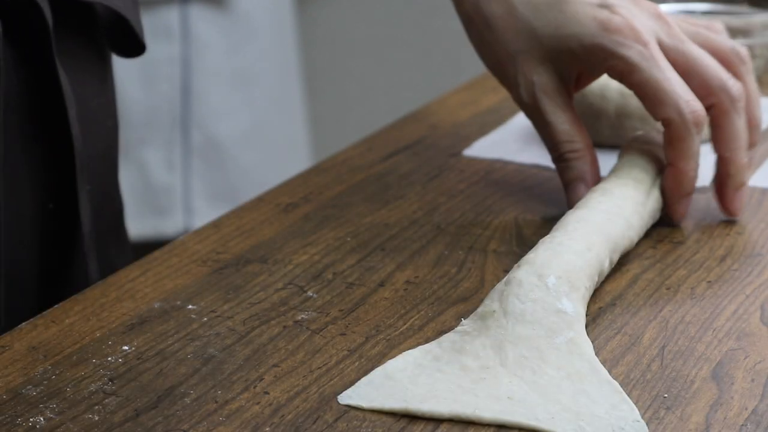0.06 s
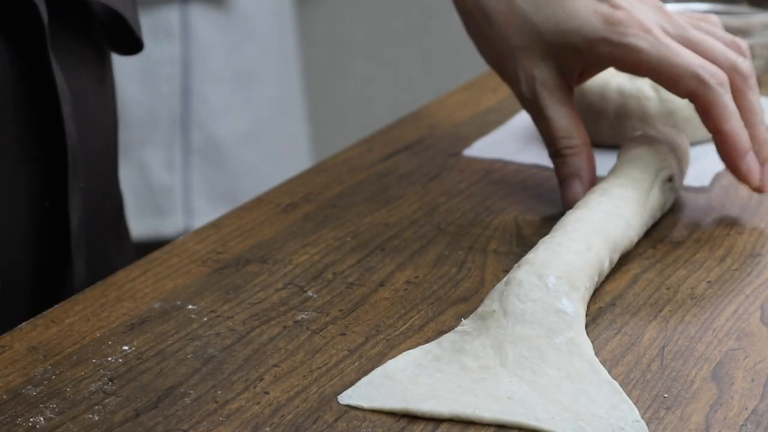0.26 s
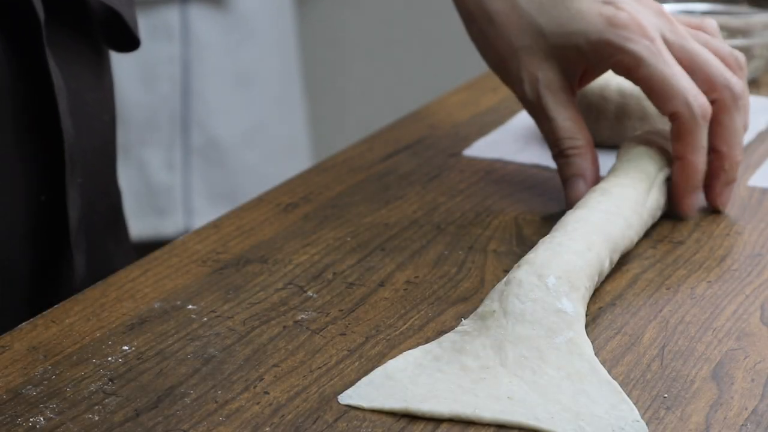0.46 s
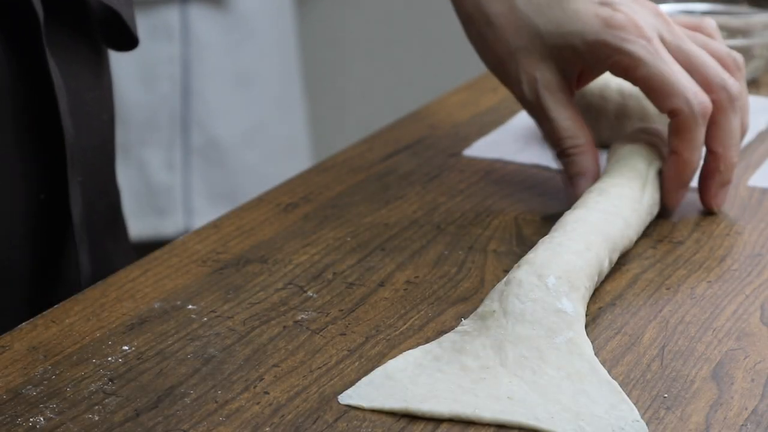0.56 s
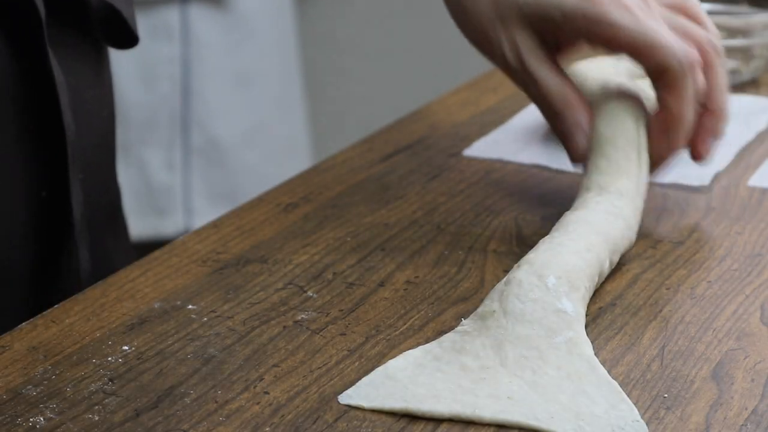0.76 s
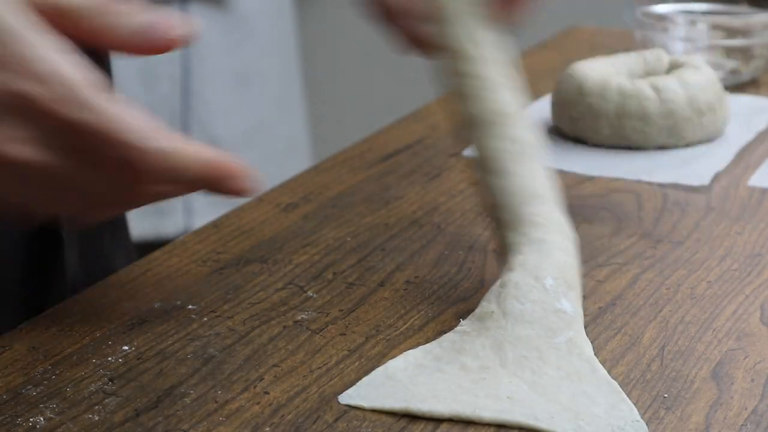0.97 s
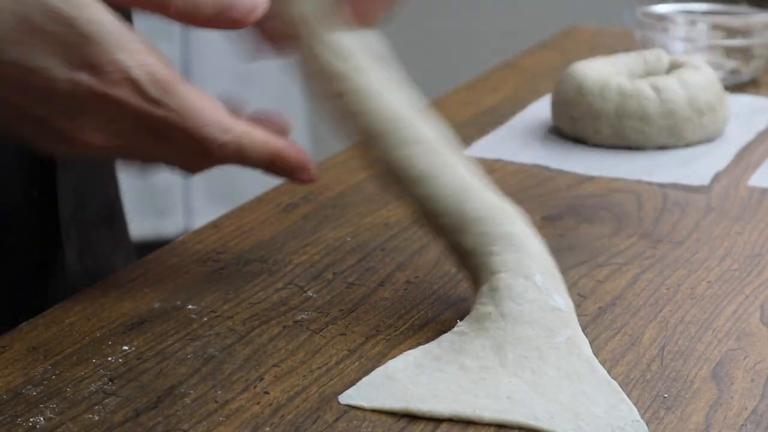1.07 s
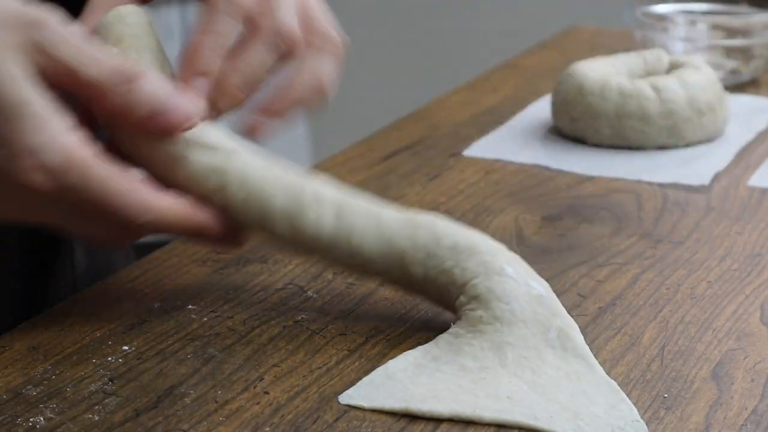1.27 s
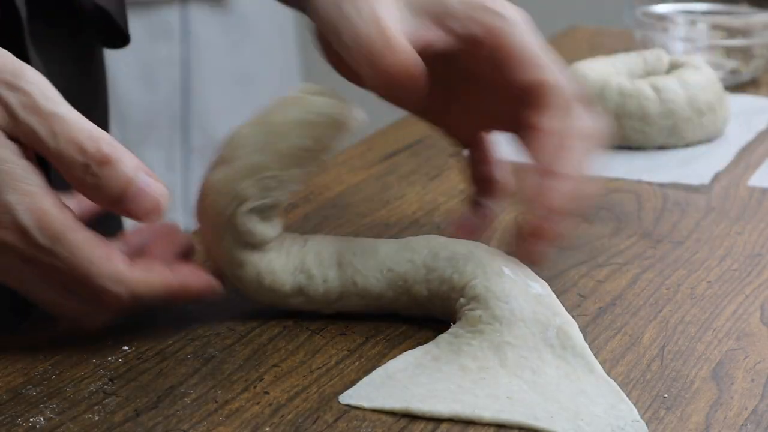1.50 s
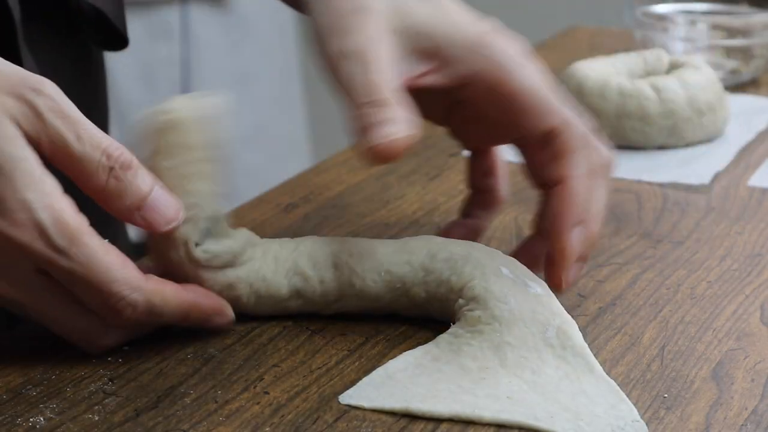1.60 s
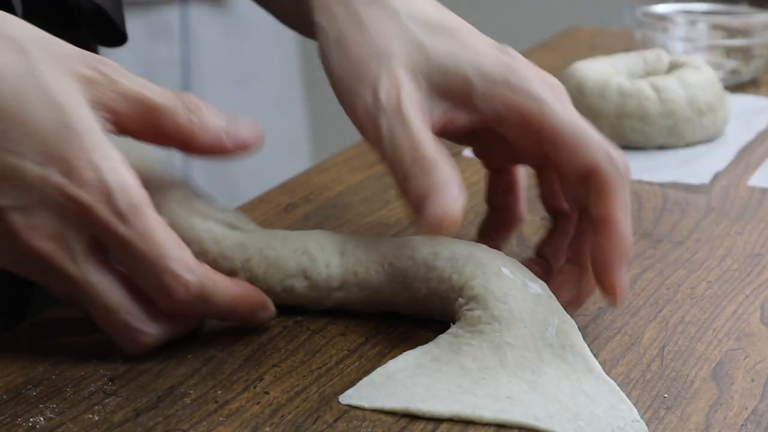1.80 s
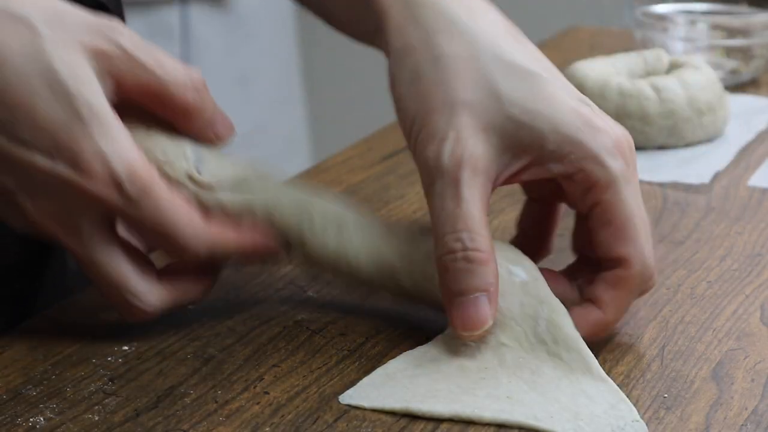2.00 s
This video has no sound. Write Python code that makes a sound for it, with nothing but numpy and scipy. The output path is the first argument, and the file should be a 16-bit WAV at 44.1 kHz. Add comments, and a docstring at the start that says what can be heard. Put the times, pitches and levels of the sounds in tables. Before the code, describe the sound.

A wooden rolling pin knocks sharply on a wooden table, echoing over faint kitchen hum.

```python
"""Room noise and the hum of a refrigerator motor, made of noise and sine waves, run all through two seconds.
From the first tenth of a second a wooden rolling pin knocks on a wooden table: short bursts of a wave, with
ringing wood and kitchen echoes. The two hardest knocks come near 0.25 s. Hands then brush dough and table
close to a two-port camera microphone, in shaped noise, and a few softer knocks come from 1.7 s to the end."""
import sys
import numpy as np
from scipy import signal
from scipy.fft import rfft, irfft
from scipy.io import wavfile
from scipy.ndimage import uniform_filter1d, map_coordinates

SR = 44100
rng = np.random.default_rng(int(sys.argv[2]) if len(sys.argv) > 2 else 0)


def transcribe(signal):
    """Save signal, clipped to [-1, 1], as a 16-bit WAV file at the path in sys.argv[1]."""
    frames = np.atleast_2d(signal).T
    limited = np.clip(frames, -1, 1)
    pcm = np.round(limited * 32767).astype(np.int16)
    wavfile.write(sys.argv[1], SR, pcm)


N = 90404  # length in samples

# Room noise shared by both ports. Each row: frequency in Hz, relative strength in dB per Hz.
AIR_SHARED = [(20, -18), (60, -20), (96, -10.5), (203, -6), (249, -17.5), (442, -9.5), (675, -16.5),
              (1030, -18.5), (1180, -20.5), (1600, -19), (3430, -30.5), (5000, -35.5), (8000, -40.5),
              (10500, -46), (12000, -51), (13500, -77)]
# Room noise that differs between the ports. Each row: frequency in Hz, relative strength in dB per Hz.
AIR_DIFFERENCE = [(60, -31), (95, -16.5), (187, -9), (473, -10), (1100, -13), (2100, -16.5), (3430, -20.5),
                  (5000, -24), (8000, -29.5), (11000, -35), (13000, -38), (15000, -48)]
AIR_SHARED_DB, AIR_DIFFERENCE_DB = -47.5, -51  # overall levels
AIR_FLICKER_DB, AIR_FLICKER_PER_S = 0.8, 8  # depth before the scaling in walk(), and steps per second

# Motor hum. Each row: multiple of MOTOR_HZ, level in dB rms before any wavering.
MOTOR_HARMONICS = [(1, -49), (2, -63), (3, -59), (6, -64.5), (8, -65.5), (9, -60.5), (13, -63.5),
                   (14, -62.5), (16, -78), (17, -67), (20, -77), (21, -62)]
MOTOR_HZ = 48.86
MOTOR_WAVER_DB, MOTOR_WAVER_PER_S = 7, 4.1  # depth before the scaling in walk(), and steps per second
# Resonances in the room noise. Each row: centre in Hz, width of one filter pass in Hz, level in dB rms.
DRONE_BANDS = [(210.9, 31.7, -50.5), (291.3, 4.9, -54.5), (319.3, 44, -56.5)]

# Hands brushing. Each row: middle in seconds, length in seconds, level in dB,
# centre in Hz, width of one filter pass in Hz.
HAND_BRUSHES = [(0.384, 0.03, -52.5, 1950, 1190), (0.54, 0.043, -53.5, 2360, 1990),
                (0.783, 0.073, -48, 2020, 1080), (0.787, 0.095, -50, 780, 704),
                (0.792, .07, -57.5, 3300, 400), (0.792, .025, -65, 4850, 500),
                (0.97, 0.11, -60.5, 2170, 2000), (1.25, 0.042, -62, 2650, 2000),
                (1.574, 0.037, -62, 2000, 350), (1.653, 0.15, -55, 2280, 600),
                (1.658, 0.083, -59, 3100, 1200), (1.749, 0.026, -46, 2120, 700),
                (1.793, .06, -62, 3450, 500), (1.753, 0.082, -54, 2540, 2200),
                (1.952, 0.078, -58, 3460, 220)]
BRUSH_GRAIN_DB, BRUSH_GRAIN_PER_S = 5.5, 500  # depth before the scaling in walk(), and steps per second
BRUSH_AIR_DB = -15  # airy treble, against the main band

# First echoes, coloured by what returns them. Each row: delay in seconds, level in dB at the centre,
# centre in Hz, width in Hz.
FIRST_ECHOES = [(.0018, 1.5, 830, 260), (.0040, -6, 810, 458), (.0112, 4.5, 920, 400),
                (.0195, -14.5, 1090, 900), (0.0357, -2.5, 610, 606), (.0400, -16, 403, 400),
                (.0475, -5.5, 900, 795), (.0555, -2.5, 905, 201), (.0655, -14, 900, 600),
                (0.0734, -15, 580, 606), (.0850, -13, 790, 398), (.0895, -15.5, 590, 498)]
ROOM_TREBLE_HZ = 3360  # the room returns little above this
ROOM_DB, ROOM_T60_S, ROOM_BUILD_S = -1, 0.43, 0.03  # T60: time to fade by 60 dB
ROOM_BRIGHT_DB, ROOM_BRIGHT_HZ = 7.5, 1370  # hard kitchen surfaces favour the upper middle
ROOM_BRIGHT_T60_S, ROOM_BRIGHT_BUILD_S = 0.54, 0.003
ROOM_CLUMP_DB, ROOM_CLUMPS_PER_S = 5, 242.5  # depth before the scaling in walk(), and steps per second
ROOM_SIDE_DB, SIDE_FROM_HZ = -11.5, 970  # above this the ports hear the room differently

# Knocks. Each row: time in seconds, level in dB before direction and filtering, pitch of the blow in Hz,
# length in cycles, direction of the push (near +1 or -1, also scales it), share sent to the room in dB.
PIN_KNOCKS = [(0.1124, -25, 990, 0.79, 0.78, -13.5), (0.122, -36, 1000, 0.83, -0.75, -13),
              (0.2387, -1.5, 748, 0.39, 0.91, -7), (0.2654, -7, 620, .4, 1, -14),
              (0.3717, -34.5, 1300, 0.64, 0.81, -3.5), (0.4824, -29.5, 420, 0.27, -0.97, -4.5),
              (.4870, -29.5, 1300, 0.35, -0.88, -6), (1.7197, -43, 1900, .8, -0.87, -9),
              (1.7518, -34, 1060, 0.5, -0.92, -11.5), (1.889, -38, 1090, 0.77, -1.16, -9),
              (1.9715, -24, 595, 0.24, -0.94, -8.5), (1.9728, -31, 324, 0.21, 0.65, -14)]
# Ring of pin and table top. Each row: frequency in Hz, starting level in dB before filtering,
# time to fade by 60 dB in seconds.
WOOD_RING = [(114.5, -36.5, 0.11), (135.3, -29, 0.098), (220, -60, 0.089), (296, -28, 0.27),
             (503, -38, 0.21), (938.3, -31, 0.23), (1215, -23.5, 0.055), (1405, -12, 0.017),
             (1615, -16.5, 0.012), (1965, -10.5, 0.017), (2240, -8.5, 0.018), (2574, -14.5, 0.011),
             (3040, -14, 0.028), (4300, -28, .005)]
CONTACT_CYCLES = 0.15  # how long the contact lasts
CONTACT_LEAD_CYCLES = 0.609  # the contact comes ahead of the blow's crest
SNAP_DB, SNAP_HZ, SNAP_S = -43, 2950, 0.0037  # hard edge of the contact; level against the blow
TABLE_LOW_HZ, TABLE_HIGH_HZ = 102.4, 3940  # the table gives little outside this range

RIGHT_LATE_S = 0.000025  # the right port hears the knocks this much later
TOP_HZ = 15000


def undb(db):
    """Turn decibels into a plain multiplier."""
    return 10 ** (np.asarray(db) / 20)


def level(x, db):
    """Set the rms level of a sound."""
    return x * undb(db) / np.sqrt(np.mean(x ** 2))


def peak(x, hz, width):
    """Two-pole band-pass, gain 1 at the centre."""
    return signal.lfilter(*signal.iirpeak(hz, hz / width, fs=SR), x)


def peak_twice(x, hz, width):
    """The same band-pass two times over, for steeper slopes."""
    return peak(peak(x, hz, width), hz, width)


def high_pass(x, hz):
    """Weaken everything below hz."""
    return signal.lfilter(*signal.butter(2, hz, "high", fs=SR), x)


def walk(rate):
    """Random levels held for 1 / rate seconds, smoothed twice and scaled by 0.38."""
    hold = int(SR / rate)
    steps = np.repeat(rng.standard_normal(N // hold + 1), hold)
    smooth = uniform_filter1d(uniform_filter1d(steps, hold), hold)
    return 0.38 * smooth[:N]


def late(x, s):
    """Delay by any fraction of a sample."""
    return map_coordinates(x, [np.arange(N) - s * SR], order=1)


def stereo(mid, side):
    """Left gets the sum, right gets the difference."""
    return np.array([mid + side, mid - side])


def air(table, db):
    """Room noise of a given spectrum; each octave flickers a little on its own."""
    hz = np.fft.rfftfreq(N, 1 / SR)[1:]
    at, dbs = np.array(table).T
    shape = undb(np.interp(np.log(hz), np.log(at), dbs))
    spectrum = np.r_[0, shape] * rfft(rng.standard_normal(N))
    octave = np.r_[-9, np.log2(hz / 60)]
    noise = 0
    for k in range(-2, 9):
        share = np.clip(1 - abs(octave - k), 0, 1)  # neighbouring octaves fade into each other
        flicker = undb(AIR_FLICKER_DB * walk(AIR_FLICKER_PER_S))
        noise = noise + irfft(spectrum * share, N) * flicker
    return level(noise, db)


def fridge():
    """Sine waves at multiples of the motor's pitch, the upper ones wavering, and a few droning resonances."""
    t = np.arange(N) / SR
    hum = 0
    for k, db in MOTOR_HARMONICS:
        waver = (k > 1) * MOTOR_WAVER_DB * walk(MOTOR_WAVER_PER_S)
        turns = k * MOTOR_HZ * t + rng.random()
        hum = hum + np.sqrt(2) * undb(db + waver) * np.sin(2 * np.pi * turns)
    for hz, width, db in DRONE_BANDS:
        hum = hum + level(peak_twice(rng.standard_normal(N), hz, width), db)
    return hum


def brushes():
    """Soft grainy swishes of skin on dough and wood: filtered noise that swells and fades."""
    t, out = np.arange(N) / SR, 0
    for s, length, db, hz, width in HAND_BRUSHES:
        grain = undb(BRUSH_GRAIN_DB * walk(BRUSH_GRAIN_PER_S))
        raw = rng.standard_normal((2, N)) * grain  # separate noise for each port
        body = level(peak_twice(raw, hz, width), 0)
        airy = level(peak(peak_twice(raw, 8600, 6600), 5100, 5000), BRUSH_AIR_DB)
        swell = np.exp(-((t - s) / length * 2) ** 2)
        out = out + undb(db) * (body + airy) * swell
    return out


def room_tail(x, t60, build):
    """Many echoes run together: clumpy noise that builds up, then fades by 60 dB in t60 seconds."""
    t = np.arange(SR // 2) / SR
    clumps = x[1]
    fade = np.minimum(t / build, 1) * undb(-60 * t / t60)
    echoes = level(rng.standard_normal(len(t)) * clumps * fade, ROOM_DB) / np.sqrt(len(t))
    return signal.fftconvolve(x[0], echoes)[:N]


def room(x):
    """A few clear echoes, then a clumpy tail whose upper part builds faster and lasts a little longer."""
    x = signal.lfilter(*signal.butter(2, ROOM_TREBLE_HZ, fs=SR), x)
    upper = undb(ROOM_BRIGHT_DB) * high_pass(x, ROOM_BRIGHT_HZ)
    clumps = undb(ROOM_CLUMP_DB * walk(ROOM_CLUMPS_PER_S)[:SR // 2])  # shared by all the tails

    def whole_tail():
        full = room_tail((x, clumps), ROOM_T60_S, ROOM_BUILD_S)
        return full + room_tail((upper, clumps), ROOM_BRIGHT_T60_S, ROOM_BRIGHT_BUILD_S)

    mid, side = whole_tail(), whole_tail()
    for s, db, hz, width in FIRST_ECHOES:
        mid = mid + undb(db) * peak(late(x, s), hz, width)
    return mid, undb(ROOM_SIDE_DB) * high_pass(side, SIDE_FROM_HZ)


def knocks():
    """A brief contact gives a blow of about a cycle and sets the wood ringing."""
    t, blows, push = np.arange(N) / SR, 0, 0
    grit = level(peak_twice(rng.standard_normal(N), SNAP_HZ, SNAP_HZ), 0)
    for s, db, hz, cycles, direction, room_db in PIN_KNOCKS:
        turn = (t - s) * hz  # cycles counted from the crest
        size = direction * undb([[db], [db + room_db]])  # two rows: heard directly, sent to the room
        blow = np.exp(-(turn / cycles) ** 2) * np.cos(2 * np.pi * turn)
        since = t - s + CONTACT_LEAD_CYCLES / hz  # seconds since the contact
        snap = undb(SNAP_DB) * grit * (since > 0) * np.exp(-abs(since) / SNAP_S)
        blows = blows + size * (blow + snap)
        contact = np.exp(-((turn + CONTACT_LEAD_CYCLES) / CONTACT_CYCLES) ** 2)
        push = push - size * contact * hz / CONTACT_CYCLES / SR
    t = t[:SR // 2]
    ring = sum(undb(db - 60 * t / t60) * np.sin(2 * np.pi * hz * t) for hz, db, t60 in WOOD_RING)
    sound = blows + signal.fftconvolve(push, ring[None], axes=1)[:, :N]
    table_range = signal.butter(4, [TABLE_LOW_HZ, TABLE_HIGH_HZ], "band", fs=SR, output="sos")
    return signal.sosfilt(table_range, sound)


def scene():
    """Add the knocks and their echoes to the hum, the brushing and the room noise."""
    hit, sent = knocks()
    mid, side = room(sent)
    near = hit + mid
    both_ports = np.array([near, late(near, RIGHT_LATE_S)])
    around = stereo(air(AIR_SHARED, AIR_SHARED_DB), side + air(AIR_DIFFERENCE, AIR_DIFFERENCE_DB))
    return both_ports + fridge() + brushes() + around


def record(dry):
    """The camera cuts the top with a steep low-pass filter."""
    return signal.sosfilt(signal.ellip(8, 0.2, 70, TOP_HZ, fs=SR, output="sos"), dry)


dry = scene()
out = record(dry)
transcribe(out)
```